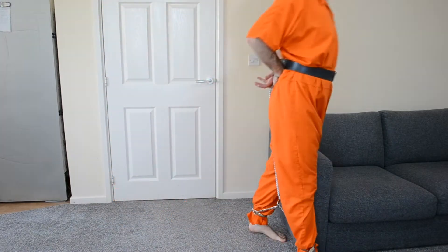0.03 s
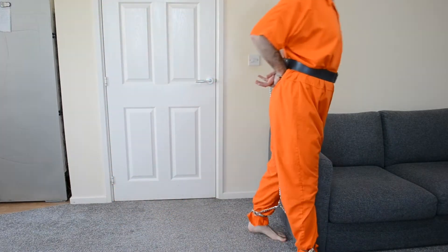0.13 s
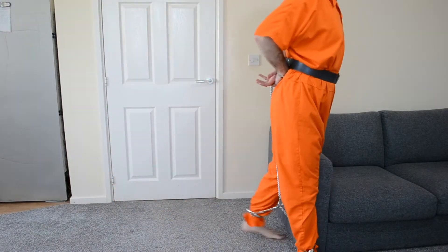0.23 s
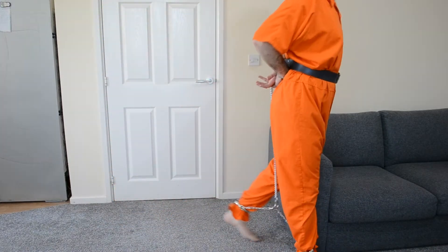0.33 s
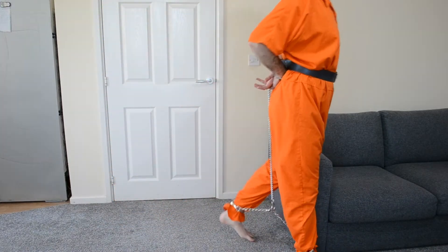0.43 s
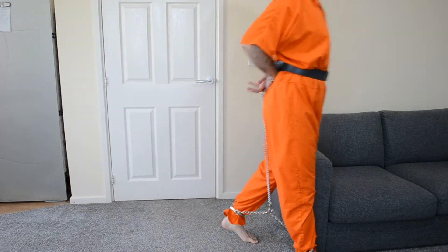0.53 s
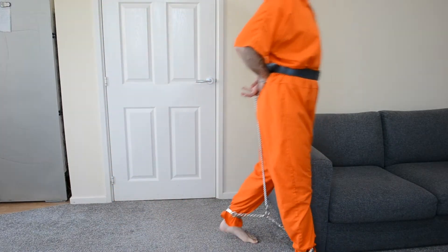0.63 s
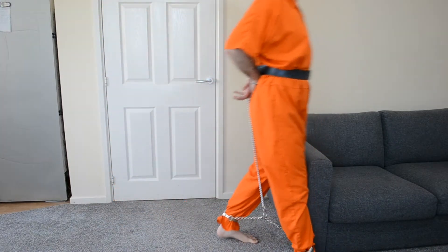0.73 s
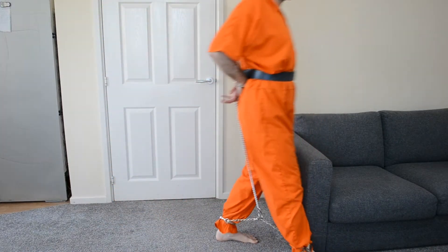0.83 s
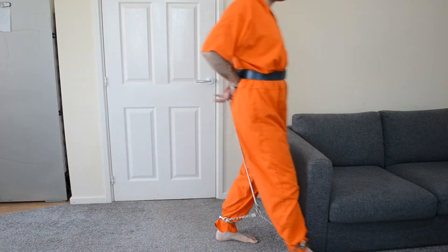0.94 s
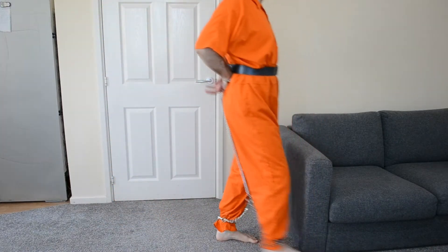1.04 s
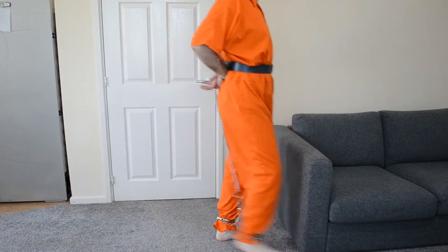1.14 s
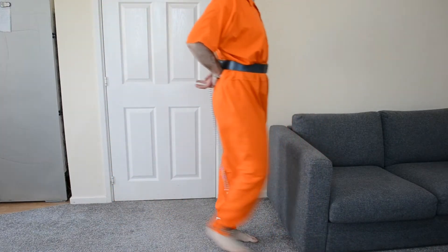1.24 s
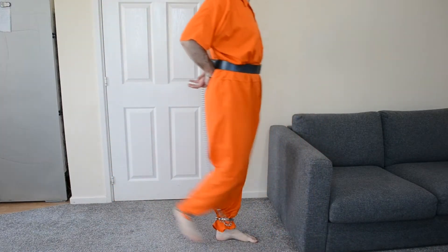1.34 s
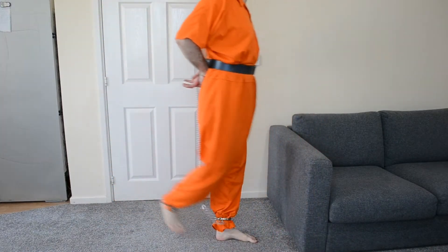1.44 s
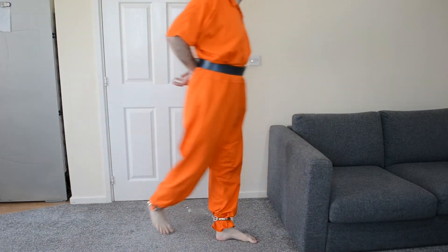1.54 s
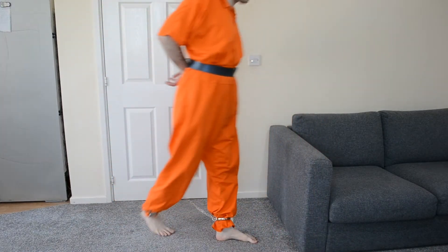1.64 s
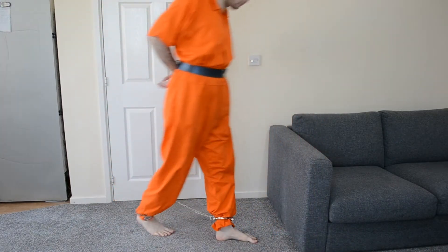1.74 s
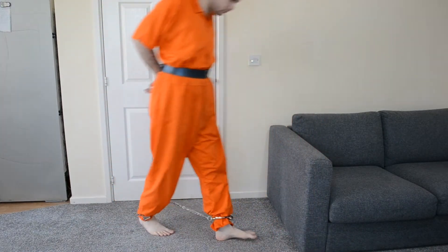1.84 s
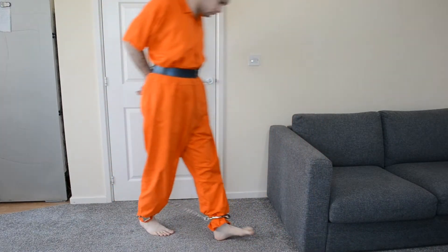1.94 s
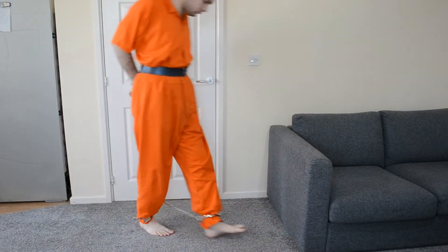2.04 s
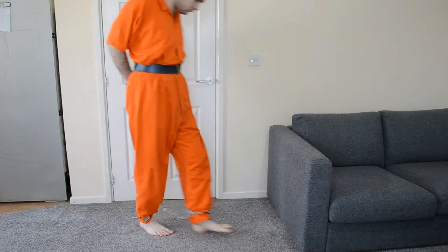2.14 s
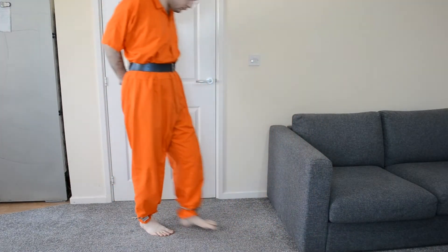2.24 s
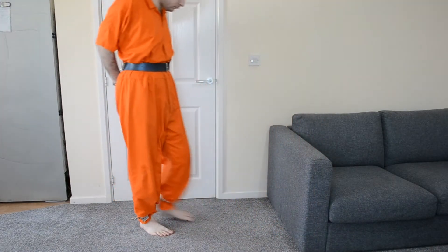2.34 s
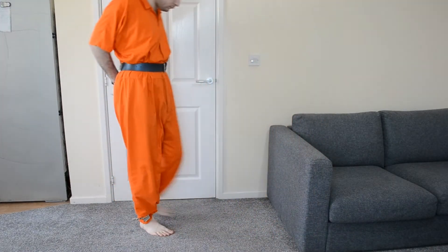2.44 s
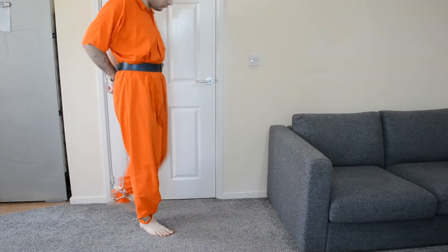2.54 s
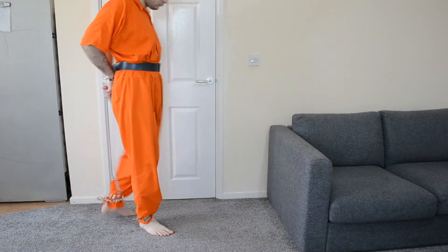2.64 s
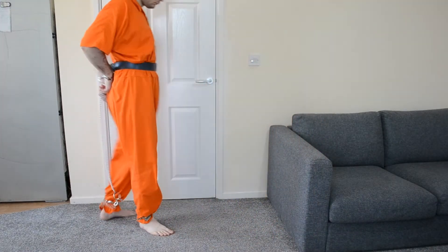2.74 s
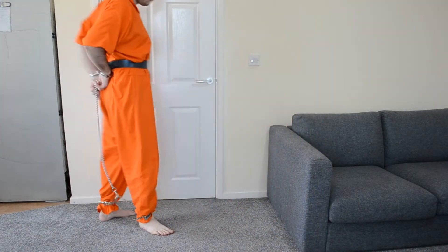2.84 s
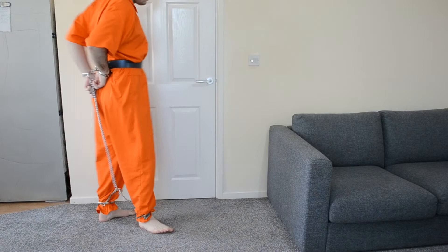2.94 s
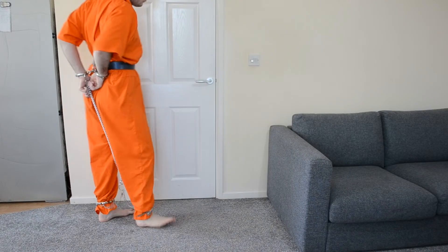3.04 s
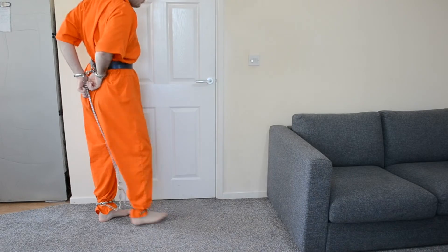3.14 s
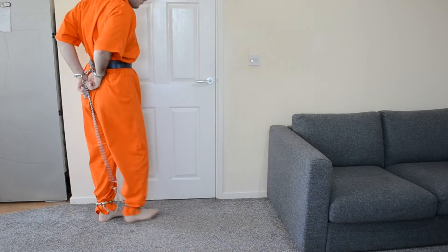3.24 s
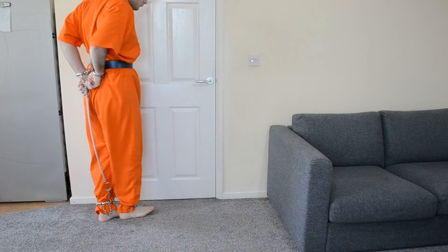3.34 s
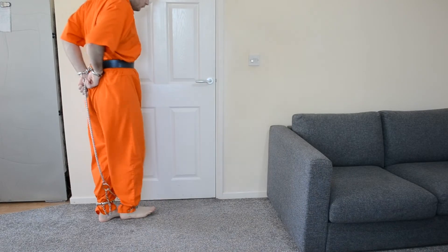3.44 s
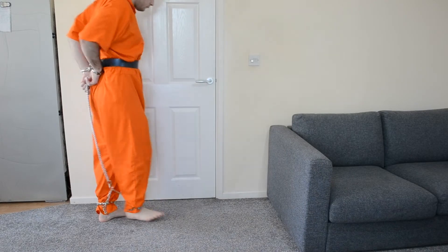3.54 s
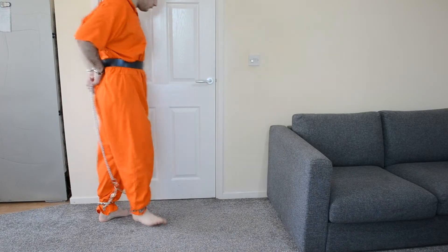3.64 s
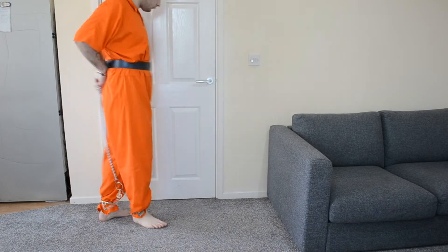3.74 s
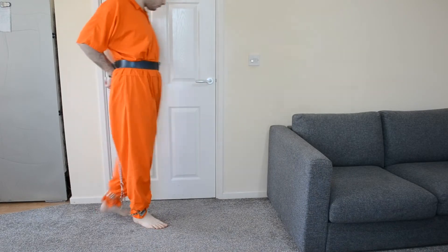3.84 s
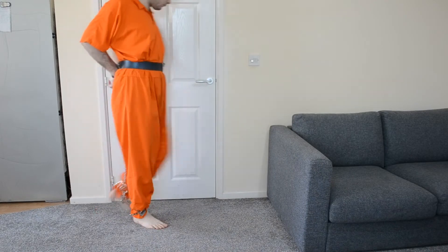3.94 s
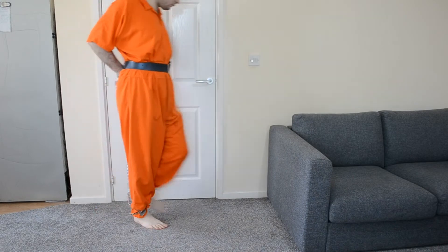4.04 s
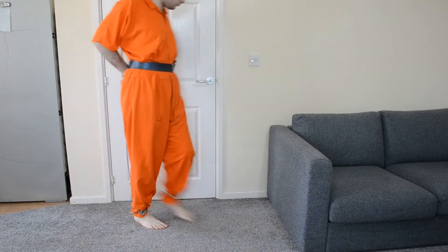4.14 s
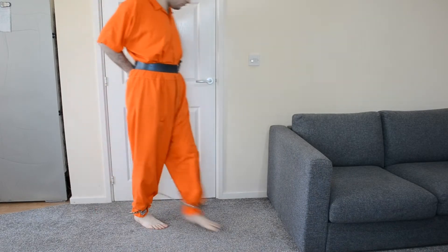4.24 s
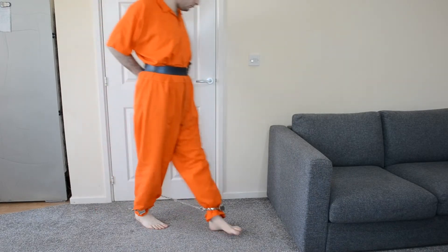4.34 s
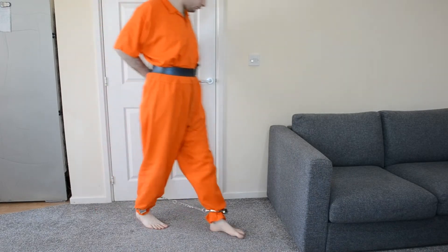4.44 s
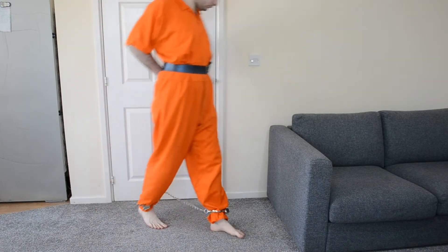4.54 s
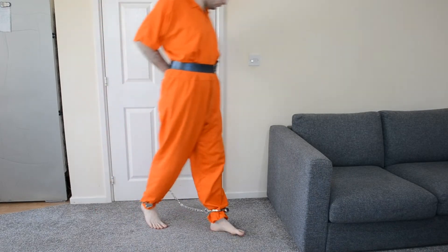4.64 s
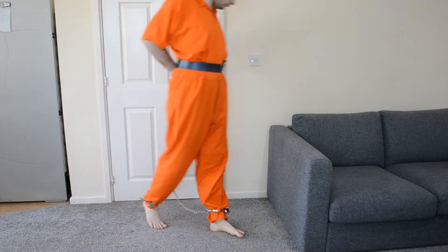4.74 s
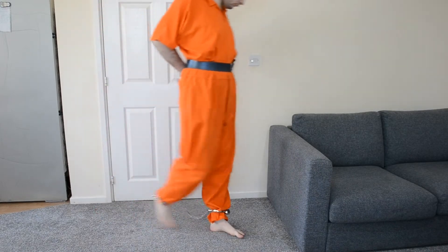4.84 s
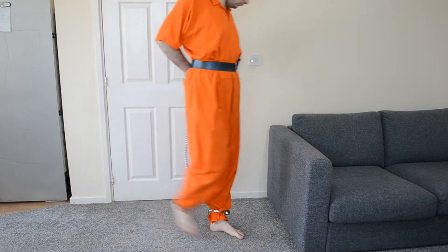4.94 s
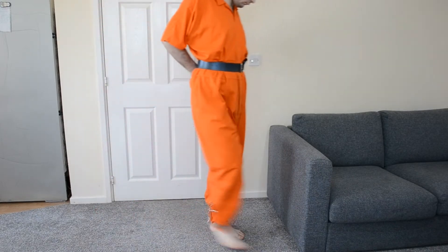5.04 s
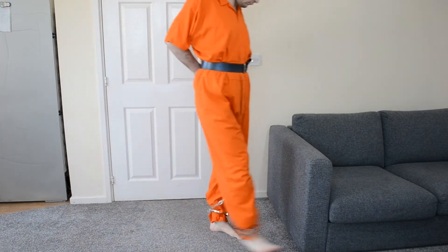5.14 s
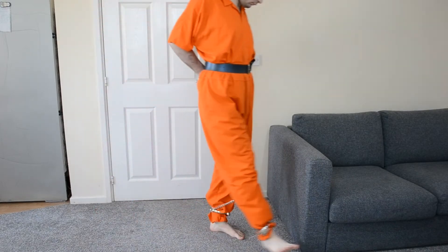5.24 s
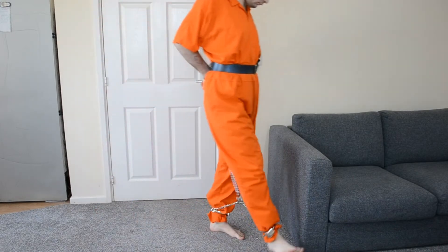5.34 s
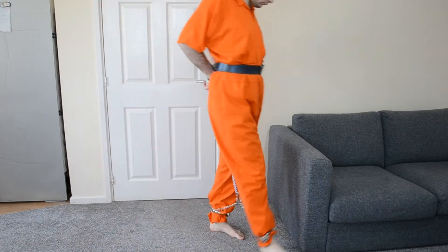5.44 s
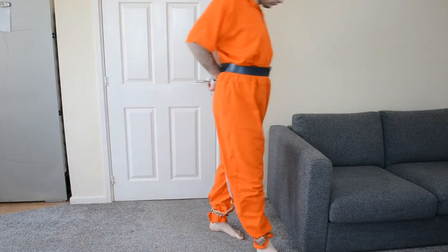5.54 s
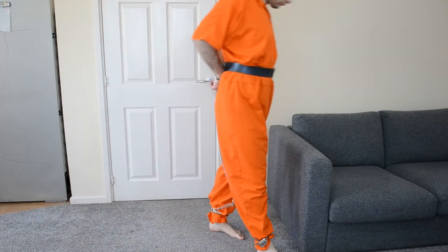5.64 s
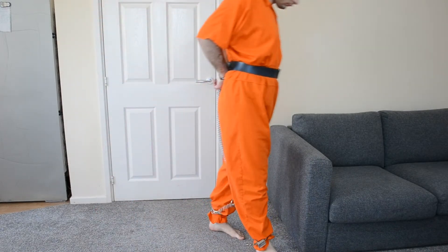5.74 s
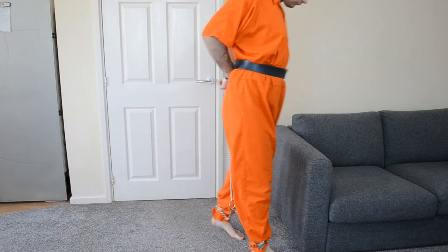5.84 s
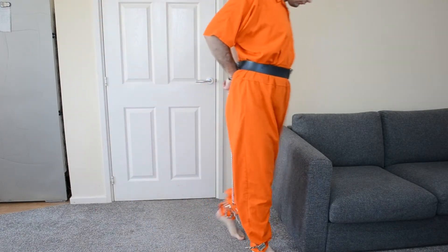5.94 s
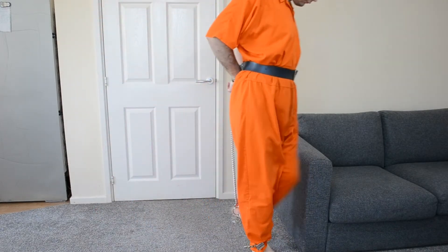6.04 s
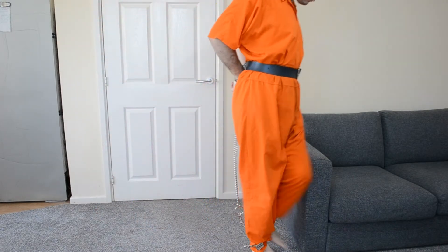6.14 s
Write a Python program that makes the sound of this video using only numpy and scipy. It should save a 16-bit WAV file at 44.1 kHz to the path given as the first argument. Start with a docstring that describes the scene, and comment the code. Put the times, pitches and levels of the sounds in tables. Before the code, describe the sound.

Steel leg irons and a chain clink, clank and jangle in bursts as someone shuffles barefoot over carpet in a small bare-walled room.

```python
"""Walking in chained leg irons

Someone walks barefoot on carpet in a small living room, in steel leg irons joined by a chain.
Links (short modes near 9.5 kHz) ping, cuffs (a crack plus modes) clank; random collisions make the rattle.
Bright cracks tick and narrow noise tinks; coloured noise swells as cloth rubs and chain drags on carpet.
Heels thud as a damped 48 Hz sine; the bare walls ring over a steady room hiss with a faint whine.
"""
import sys
import numpy as np
from scipy import signal
from scipy.fft import rfft, irfft
from scipy.io import wavfile
from scipy.ndimage import uniform_filter1d

SR = 44100
rng = np.random.default_rng(int(sys.argv[2]) if len(sys.argv) > 2 else 0)


def dump_mix(stems):
    """Bounce the given channels to the path in sys.argv[1] as a 16-bit WAV at rate SR."""
    frames = np.atleast_2d(stems).T  # one column per channel
    limited = np.clip(frames, -1, 1)  # hard clip at full scale
    pcm = np.round(limited * 32767).astype(np.int16)
    wavfile.write(sys.argv[1], SR, pcm)


N = 272979
TIME = np.arange(N) / SR

# one link tapping the next: start_s, attack_db (before gain), ring_hz
LINK_TAPS = [(1.198, -42.5, 9390), (1.2732, -36, 9600), (1.3862, -44, 9480), (1.4072, -45.5, 9600),
             (1.504, -45, 9550), (1.5248, -44, 9470), (1.6283, -43, 9430), (1.6738, -43, 9600),
             (1.7653, -43.5, 9560), (2.317, -45, 9960), (2.61, -33.5, 9670), (2.7333, -40.5, 9660),
             (2.7569, -37.5, 9500), (2.7948, -31, 9520), (2.8717, -38, 9610), (2.9862, -49, 9600),
             (3.0453, -38, 9450), (3.2005, -35, 9670), (3.2557, -34.5, 9610), (3.3253, -35, 9660),
             (3.3743, -37.5, 9800), (3.544, -49, 9670), (3.5909, -35.5, 9630), (3.6228, -39.5, 9570),
             (3.6517, -40.5, 9640), (3.7422, -39, 9510), (3.8673, -47.5, 9730), (4.9402, -51, 9550),
             (5.018, -39, 9420), (5.232, -32, 9360), (5.947, -50, 9650), (5.9918, -47.5, 9570)]
# a cuff struck by its chain: start_s, attack_db (before gain), strongest_hz, tilt_db_per_octave
CUFF_BLOWS = [(1.109, -37, 6330, 0), (1.388, -40.5, 3020, -1), (1.587, -46.5, 6990, -3.5),
              (1.617, -44, 5020, -3), (1.6583, -40.5, 6650, -3.5), (1.7468, -44, 5160, -2.5),
              (2.059, -48.5, 3370, 0.5), (2.3915, -34, 3030, -1.5), (2.478, -41.5, 4610, 0),
              (2.534, -30, 3750, -4), (2.7691, -32, 6970, 1), (2.8763, -40, 3900, 0),
              (3.4348, -26, 6900, 1.5), (3.5914, -44.5, 6250, -3), (3.779, -35, 4600, 0),
              (3.8844, -41, 6900, -1.5), (3.947, -31, 6700, 5.5), (4.281, -37.5, 7100, 2.5),
              (4.8804, -53, 4770, 0), (4.9595, -45, 7140, -2), (5.0382, -23.5, 4460, 3.5),
              (5.173, -28.5, 5230, 4), (5.244, -24.5, 3940, 0.5), (5.5654, -37.5, 4500, -1.5),
              (6.003, -38.5, 5620, 2.5)]
# colour of the crack of steel on steel: freq_hz, density_db (relative, per Hz)
CRACK_COLOUR = [(60, -67), (300, -18), (600, -22.5), (1000, -12), (2000, -13.5), (3400, -1.5), (7000, -9),
                (8000, -9), (10000, -5), (11500, -0.5)]


def amp(db):
    """dB to linear gain."""
    return 10 ** (np.asarray(db) / 20)


def unit(x):
    """Scale to rms 1."""
    return x / np.sqrt(np.mean(x ** 2) + 1e-20)


def read(points, hz):
    """A curve's value at hz, interpolated on a log frequency axis."""
    f, value = np.transpose(points)
    return np.interp(np.log(hz + 1), np.log(f + 1), value)


def level(rows, axis=1):
    """One dB column of a time curve as a gain per sample, silent outside it."""
    rows = np.asarray(rows)
    db = np.interp(TIME, rows[:, 0], rows[:, axis], left=-140, right=-140)
    return amp(db)


def add(mix, s, sound):
    """Mix a sound in at s seconds, cut at the end of the mix."""
    start = max(round(s * SR), 0)
    part = mix[start:][:len(sound)]
    part += sound[:len(part)]


def noise(colour, size=N):
    """Noise of rms 1 with the given colour."""
    gain = amp(read(colour, np.fft.rfftfreq(size, 1 / SR)))
    return unit(irfft(rfft(rng.standard_normal(size)) * gain, size))


def resonant_noise(hz, width_hz, size=N):
    """Noise of rms 1 in one resonance; gain is halved width_hz from its centre."""
    offset = (np.fft.rfftfreq(size, 1 / SR) - hz) / width_hz
    return unit(irfft(rfft(rng.standard_normal(size)) / (1 + offset ** 2), size))


def attack_of(x, size=220):
    """The rms of a sound's loudest 5 ms."""
    return np.sqrt(uniform_filter1d(x ** 2, size).max())


def swells(rows):
    """Bell-shaped rises and falls of gain, one per row of (centre_s, level_db, half_length_s)."""
    return sum(amp(db) * np.exp(-((TIME - s) / half_s) ** 2) for s, db, half_s in rows)


def burst(start_s, rise_s, hold_s, release_s):
    """A gain that rises linearly, holds and dies away exponentially."""
    t = TIME - start_s
    rise = np.clip(t / rise_s, 0, 1)
    return rise * np.exp(-np.maximum(t - rise_s - hold_s, 0) / release_s)


def ring(modes, size=2048):
    """Sum of dying modes (freq_hz, level_db, t60_s); strengths vary with where the blow lands."""
    t = TIME[:size]
    hz, db, t60_s = np.transpose(modes)[:, :, None]
    place, phase = rng.standard_normal(hz.shape), rng.random(hz.shape)
    decay = np.exp(-np.log(1000) * t / t60_s)
    tones = amp(db + 2 * place) * decay * np.sin(2 * np.pi * (hz * t + phase))
    return tones.sum(0)


def radiated(x, corner_hz=380):
    """Small pieces of steel give off almost no bass."""
    return signal.sosfilt(signal.butter(2, corner_hz, "high", fs=SR, output="sos"), x)


def link(hz, crack_db=-15, crack_s=0.009):
    """A link rings briefly before its neighbours damp it."""
    # modes: ratio (to the main ring), level_db (mean), t60_s
    link_modes = [(.365, -23.5, .04), (.545, -38, .03), (.74, -24, 0.019), (1, -1, .026),
                  (1.045, -9.5, 0.012)]
    body = ring([(hz * ratio, db, t60_s) for ratio, db, t60_s in link_modes])
    crack = noise(CRACK_COLOUR, size=len(body)) * np.exp(-TIME[:len(body)] / crack_s)
    return body + amp(crack_db) * crack


def pings(gain_db=-2, rebound_db=-1, rebound_s=0.0017, count=3):
    """Each link taps its neighbour and chatters against it for a few milliseconds."""
    out = np.zeros(N)
    for s, db, hz in LINK_TAPS:
        tap = link(hz)
        for k in range(count):
            late_s = rebound_s * (k + rng.uniform(.6, 1.5))
            add(tap, late_s, amp(rebound_db * k) * link(hz * rng.uniform(0.98, 1.01)))
        add(out, s, amp(db + gain_db) * tap / attack_of(tap))
    return out


def cuff(hz, tilt_db=0, focus_db=7, focus_width_hz=400, crack_s=0.0077, detune=0.014):
    """A hard crack plus modes boosted near hz; modes are detuned a little at random per blow."""
    # modes: freq_hz (before detuning), level_db (mean, before focus), t60_s
    cuff_modes = [(1913, -13, 0.05), (2330, -9, 0.025), (3075, -2.5, 0.037), (3550, -15.5, 0.022),
                  (3760, -4.5, 0.02), (3970, -9.5, 0.0346), (4720, -1.5, 0.048), (5207, 2, 0.035),
                  (5800, 2, 0.018), (6260, 1, 0.031), (6773, 4.5, 0.023), (7180, 4, 0.029),
                  (8940, 0.5, 0.024), (9690, 0.5, 0.017), (10900, -18, 0.031)]
    modes = []
    for f, db, t60_s in cuff_modes:
        focus = np.exp(-((f - hz) / focus_width_hz) ** 2)
        modes.append((f * (1 + detune * rng.standard_normal()), db + focus_db * focus, t60_s))
    body = ring(modes)
    crack = np.sqrt(2) * noise(CRACK_COLOUR, size=len(body)) * np.exp(-TIME[:len(body)] / crack_s)
    blow = np.pad(body / attack_of(body) + crack, (0, len(body)))
    # tilt pivots at 5 kHz, level below 1 kHz
    octaves = np.log2(np.maximum(np.fft.rfftfreq(len(blow), 1 / SR), 1000) / 5000)
    return irfft(rfft(blow) * amp(tilt_db * octaves))[:len(body)]


def clanks(gain_db=-1, rebound_db=-4, chatter_s=.006, count=5):
    """A blow on a cuff, followed by weaker ones as more links arrive."""
    out = np.zeros(N)
    for s, db, hz, tilt_db in CUFF_BLOWS:
        blow = np.pad(cuff(hz, tilt_db), (0, SR // 10))
        for late in (np.arange(count) + rng.random(count)) / 2:  # in units of chatter_s
            add(blow, late * chatter_s, amp(rebound_db) * np.exp(-late) * cuff(hz, tilt_db))
        add(out, s, amp(db + gain_db) * blow / attack_of(blow))
    return out


def contact(tick_db=5.5, tick_s=0.0013, t60_s=0.026, count=10):
    """One small collision in the heap of steel: a tick and short modes at random pitches."""
    # colour of small collisions: freq_hz, level_db (relative)
    clatter_colour = [(60, -59), (300, -24), (700, -6), (2000, -2.5), (2700, -1.5), (3500, 4), (4300, -1.5),
                      (5300, 3.5), (6200, 0), (7100, -3.5), (8000, -7), (9000, 2), (10600, -11), (11500, 9)]
    body = ring([(hz, read(clatter_colour, hz), t60_s) for hz in rng.uniform(900, 11000, count)])
    tick = noise(clatter_colour, size=len(body)) * np.exp(-TIME[:len(body)] / tick_s)
    return .5 * body + amp(tick_db) * tick


def shower(voices, per_s, spread_db):
    """Random collisions of uneven force, shared among several ringing pieces, at rms 1."""
    out = np.zeros(N)
    for at_s in np.arange(0, N / SR, 1 / per_s):
        force = amp(spread_db * min(rng.exponential(), 3))
        add(out, at_s + rng.random() * 2 / per_s, force * voices[rng.integers(len(voices))])
    return unit(out)


def aftermath(blows, release_s):
    """Each blow shakes the chain in proportion to its force, and the shaking dies away."""
    kicks = np.zeros(N)
    for s, db, *_ in blows:
        add(kicks, s, amp([db]))
    return signal.lfilter([1], [1, -np.exp(-1 / (release_s * SR))], kicks)


def rattle(slack_db=-2, swing_db=-1, jingle_db=-2, after_clank_db=-24, after_ping_db=-20,
           after_clank_s=0.056, after_ping_s=0.031, settle_s=0.039, link_hz=9582, link_spread=0.0088,
           count=80):
    """The whole chain in motion: sparser collisions when slack or just struck, denser when it swings."""
    # slack chain stirring as the walker moves: time_s, clatter_db, jingle_db (before gains)
    slack = [(1.1, -78, -69), (1.25, -53.5, -62), (1.72, -58.5, -61), (1.95, -77, -84), (2.25, -62.5, -72),
             (2.42, -51, -59.5), (3.15, -58, -70), (3.3, -58.5, -63), (3.7, -63, -60), (4.1, -58.5, -67.5),
             (4.75, -72.5, -94), (5.4, -65, -74), (5.8, -64, -94), (6.19, -67.5, -83)]
    # chain whipping through as a leg passes: start_s, rise_s, hold_s, clatter_db, jingle_db (before gain)
    swings = [(1.6, 0.038, 0.022, -44, -46.5), (2.532, .003, 0.028, -36, -37.5),
              (4.29, 0.037, 0.048, -36, -40.5), (5.016, 0.022, 0.2, -42, -40),
              (5.244, 0.0043, .07, -34.5, -45.5)]
    pieces = [contact() for _ in range(count)]
    pieces += [cuff(rng.uniform(3500, 7300)) for _ in range(count // 4)]
    links = [link(link_hz * (1 + link_spread * rng.standard_normal())) for _ in range(count)]

    stir = amp(slack_db) * level(slack, axis=1)
    stir += amp(after_clank_db) * aftermath(CUFF_BLOWS, after_clank_s)
    jingle = amp(jingle_db) * level(slack, axis=2)
    jingle += amp(after_ping_db) * aftermath(LINK_TAPS, after_ping_s)
    swing = np.zeros(N)
    for start_s, rise_s, hold_s, clatter_db, links_db in swings:
        whip = amp(swing_db) * burst(start_s, rise_s, hold_s, settle_s)
        swing += amp(clatter_db) * whip
        jingle += amp(links_db) * whip

    out = stir * shower(pieces, per_s=200, spread_db=3.0)
    out += swing * shower(pieces, per_s=600, spread_db=2.5)
    return out + jingle * shower(links, per_s=220, spread_db=3.0)


def ticks(gain_db=-2, decay_s=0.0013, lowest_hz=3500):
    """Small hard collisions of steel with hardly any ring: a single bright crack, damped at once."""
    # collisions: start_s, attack_db (before gain)
    hits = [(2.6745, -33), (4.082, -37), (4.088, -39.5), (4.128, -35), (4.15, -57), (4.561, -41),
            (4.836, -58), (5.844, -55)]
    out, t = np.zeros(N), TIME[:SR // 20]
    for s, db in hits:
        crack = radiated(noise(CRACK_COLOUR, size=len(t)), lowest_hz) * np.exp(-t / decay_s)
        add(out, s, amp(db + gain_db) * crack / attack_of(crack))
    return out


def tinks(decay_s=0.014, width_hz=140):
    """Small knocks on a cuff or ring: a short, rough, narrow-band tink."""
    # knocks: start_s, level_db (rms before decay), centre_hz
    knocks = [(1.387, -49.5, 1730), (2.388, -48.5, 3080), (2.415, -50, 1550), (2.772, -44, 3800),
              (3.648, -54, 3480), (5.02, -47.5, 3340), (5.172, -42, 3300)]
    out, t = np.zeros(N), TIME[:SR // 8]
    for s, db, hz in knocks:
        add(out, s, amp(db) * resonant_noise(hz, width_hz, size=len(t)) * np.exp(-t / decay_s))
    return out


def cloth(gain_db=-1, grain_db=2):
    """Soft grainy noise swells: cloth rubbing, and the low-mid body of the clashes at 2.55 and 5.28 s."""
    # swells of cloth and clash body: centre_s, level_db (before gain), half_length_s
    soft_swells = [(1.06, -57.5, .1), (1.66, -58.5, 0.1), (2.17, -51.5, 0.092), (2.55, -54, 0.053),
                   (3.4, -51.5, 0.086), (3.97, -60, 0.093), (4.36, -61, 0.11), (5.07, -58, 0.13),
                   (5.28, -50.5, 0.1), (5.58, -59.5, 0.032), (5.91, -57, 0.063)]
    # colour of the swells: freq_hz, density_db (relative, per Hz)
    cloth_colour = [(60, -26), (250, -14.5), (700, -3.5), (1100, -2), (1900, 0), (3000, -3), (4500, -7.5),
                    (7000, -16.5), (10000, -20), (12000, -30)]
    grain = amp(grain_db * unit(uniform_filter1d(rng.standard_normal(N), size=130)))
    return amp(gain_db) * swells(soft_swells) * unit(noise(cloth_colour) * grain)


def chain_drag(gain_db=-1):
    """The chain drags over the carpet: low noise swells."""
    # drags: centre_s, level_db (before gain), half_length_s
    drags = [(4.385, -50.5, 0.059), (5.28, -63.5, 0.096)]
    # colour of chain on carpet: freq_hz, density_db (relative, per Hz)
    drag_colour = [(40, -26), (120, -8), (220, 4.5), (450, -3), (950, 7.5), (1500, -8), (3000, -19),
                   (9000, -38)]
    return amp(gain_db) * swells(drags) * noise(drag_colour)


def heel_thuds(thud_hz=48, thud_s=0.026):
    """Heels push the floorboards into a dull thud, a quickly damped low sine."""
    # heels landing: start_s, envelope_peak_db
    heels = [(1.75, -80), (1.83, -77), (4.51, -76), (5.24, -79), (5.59, -73)]
    out, t = np.zeros(N), TIME[:SR // 2]
    thud = t / thud_s * np.exp(1 - t / thud_s) * np.sin(2 * np.pi * thud_hz * t)
    for s, db in heels:
        add(out, s, amp(db) * thud)
    return out


def sleeves():
    """Sleeves rustle: soft swells of crisp cloth noise."""
    # rustles: centre_s, level_db, half_length_s
    rustles = [(0.072, -61, 0.11), (0.294, -63, 0.065), (.58, -61, 0.031), (6.15, -65, 0.085)]
    # colour of the sleeves: freq_hz, density_db (relative, per Hz)
    sleeve_colour = [(100, -25), (800, 6.5), (4000, -2.5), (7000, -11), (11000, -15)]
    return noise(sleeve_colour) * swells(rustles)


def room(x, gap_s=0.0046, turns_per_s=20, count=5):
    """Dense wall echoes; patterns crossfade at a steady rate, which keeps the echoes evenly coloured."""
    # decay time of the room: freq_hz, t60_s
    room_decay = [(200, 0.29), (1500, 0.32), (4000, 0.41), (7000, 0.41), (10500, 0.26)]
    out = np.zeros(N)
    for k in range(count):
        taps = rng.standard_normal(SR) * (rng.random(SR) < .1) * (TIME[:SR] > gap_s)
        hz, t, bands = signal.stft(taps, SR, nperseg=256)
        decay = np.exp(-np.log(1000) * t / read(room_decay, hz)[:, None])
        tail = signal.istft(bands * decay, SR)[1]
        turn = (turns_per_s * TIME + k) % count
        share = np.sin(np.pi * turn / 2) * (turn < 2)  # equal-power fade into the next pattern
        out += signal.oaconvolve(x * share, tail / np.linalg.norm(tail))[:N]
    return out


def background(hiss_db=-64):
    """Steady coloured hiss with a faint, fuzzy whine in it from narrow noise bands."""
    # colour of the room's hiss: freq_hz, density_db (relative, per Hz)
    hiss_colour = [(15, -56), (25, -18.5), (129, -8.5), (215, -4.5), (263, -4), (307, -3), (397, -3),
                   (513, -2.5), (629, -2), (1020, -4.5), (2210, -7), (2640, -11.5), (3080, -9.5),
                   (9490, -28), (11400, -36), (14800, -77), (22000, -120)]
    # whine: centre_hz, width_hz, level_db (rms)
    whine_bands = [(2630, 21, -76.5), (2742, 57, -73)]
    whine = sum(amp(db) * resonant_noise(hz, width_hz) for hz, width_hz, db in whine_bands)
    return amp(hiss_db) * noise(hiss_colour) + whine


def scene(ping_wet_db=-5, clank_wet_db=-1, motion_wet_db=-4):
    """Steel, cloth and feet, heard directly and from the walls, over the background."""
    taps = radiated(pings())
    blows = radiated(clanks() + ticks() + tinks())
    motion = radiated(rattle()) + cloth() + chain_drag() + heel_thuds() + sleeves()
    echoes = room(amp(ping_wet_db) * taps + amp(clank_wet_db) * blows + amp(motion_wet_db) * motion)
    return (taps + blows + motion + echoes + background())[None]


def record(dry, corner_hz=10700, edge_hz=11650):
    """The microphone's top end rolls off, then the band limit."""
    rolloff = signal.firwin(numtaps=61, cutoff=corner_hz, fs=SR)
    soft = signal.oaconvolve(dry, rolloff[None], "same")
    band_limit = signal.firwin(201, edge_hz, window=("kaiser", 6), fs=SR)
    return signal.oaconvolve(soft, band_limit[None], "same")


dry = scene()
out = record(dry)
dump_mix(out)
```